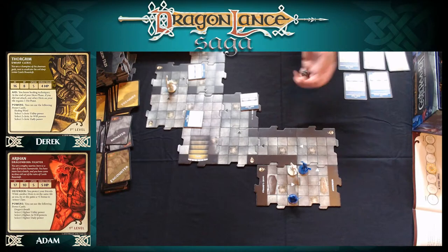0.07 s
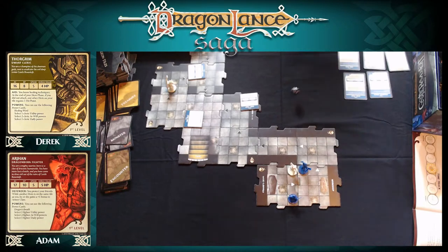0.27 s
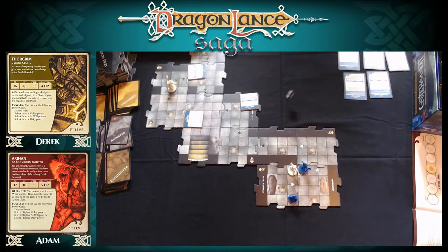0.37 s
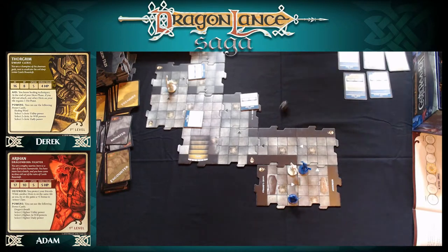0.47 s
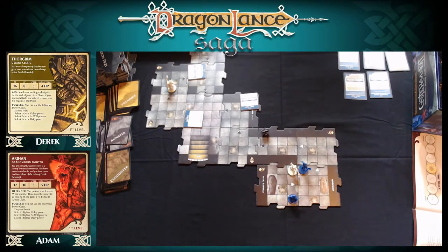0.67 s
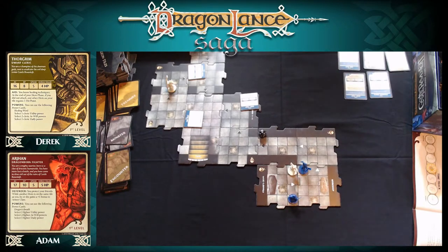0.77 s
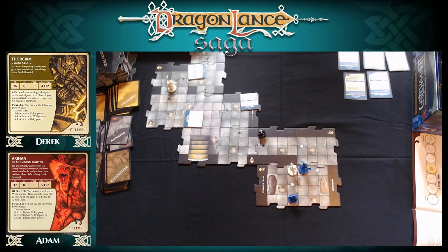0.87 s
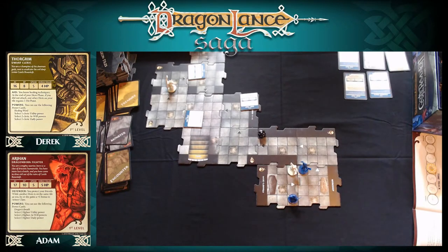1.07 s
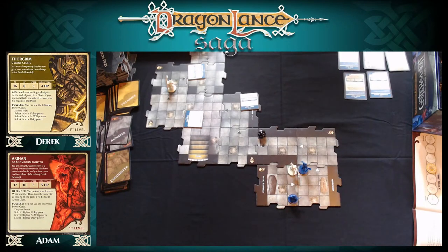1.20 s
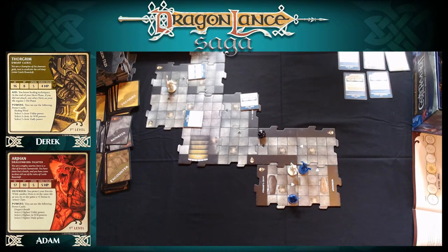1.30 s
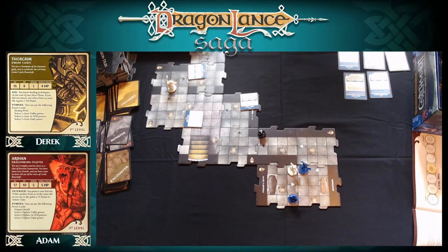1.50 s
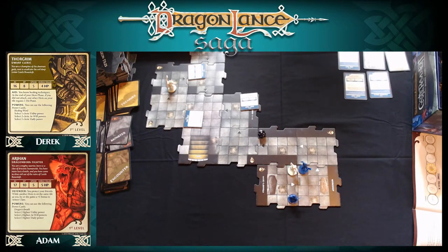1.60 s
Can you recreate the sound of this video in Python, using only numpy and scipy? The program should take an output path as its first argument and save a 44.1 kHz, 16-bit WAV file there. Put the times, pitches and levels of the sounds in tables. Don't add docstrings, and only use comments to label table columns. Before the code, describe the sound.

A small plastic die lands with a sharp knock on a cloth-covered wooden table, bounces, rolls softly and ticks lightly against thin tiles, in a small room with a faint fan hum, heard from a distance.

```python
import sys
import numpy as np
from scipy import signal
from scipy.fft import rfft, irfft
from scipy.io import wavfile

SR = 44100
rng = np.random.default_rng(int(sys.argv[2]) if len(sys.argv) > 2 else 0)


def store_pcm(level_fs):
    pcm = np.round(np.clip(level_fs, -1, 1) * 32767).astype(np.int16)
    wavfile.write(sys.argv[1], SR, np.atleast_2d(pcm).T)


def decibels_to_gain(level_db):
    exponent = np.asarray(level_db, float) / 20
    return 10 ** exponent


N = 72765


def shaped(size, gain):
    hz = np.maximum(np.arange(size // 2 + 1) * SR / size, 1)
    noise = irfft(rfft(rng.standard_normal(size)) * gain(hz), size)
    return noise / noise.std()


def spectrum_gain(points):
    hz, db = np.array(points).T
    return lambda f: decibels_to_gain(np.interp(np.log(f), np.log(hz), db))


# frequency_hz, rms_level_db, bandwidth_hz
FAN_LINES = [(72.7, -64.5, 2.4), (154, -81, 3.8), (177.3, -77, 6), (313, -78.5, 15), (442.3, -73, 4.9),
             (602, -74.5, 34), (1210, -83.5, 8.1), (1556, -86.5, 10), (8500, -95.5, 3.5)]
# frequency_hz, density_db
AIR_SPECTRUM = [(40, -1.5), (100, -3.5), (600, 2), (800, -4), (1600, -4.5), (1900, -10.5), (4000, -23),
                (15000, -25.5)]


def fan():
    t = np.arange(N) / SR
    hum_hz, hum_db, hum_width = FAN_LINES[0]
    wander_rad = 0.43 * shaped(N, lambda f: 1 / (1 + (f / hum_width) ** 2))
    out = np.sqrt(2) * decibels_to_gain(hum_db) * np.sin(2 * np.pi * hum_hz * t + wander_rad)
    for hz, db, width in FAN_LINES[1:]:
        out += decibels_to_gain(db) * shaped(N, lambda f: 1 / (1 + (2 * (f - hz) / width) ** 2))
    flicker_db = 0.6 * shaped(N, lambda f: 1 / (1 + (f / 8) ** 2))
    return out + decibels_to_gain(-68.5 + flicker_db) * shaped(N, spectrum_gain(AIR_SPECTRUM))


# delay_ms, level_db
NEAR_REFLECTIONS = [(.65, 0), (1.3, 1), (1.9, -3)]
# delay_ms, level_db
EARLY_ECHOES = [(5, 1), (10, 1.5), (16.5, -8), (22, -4.5), (27, -9), (32, -26), (43, -22), (52, -9)]
# centre_hz, level_db, t60_s
DIFFUSE_TAIL = [(119.6, -25, 0.93), (265, -26.5, 0.43), (534, -28.5, 0.39), (1056, -25.5, .34),
                (2026, -20, 0.35), (4110, -26, 0.35), (8000, -18.5, 0.33)]


def room(room_db):
    direct_db, near_blur_ms, echo_smear_ms, tail_rise_s = 4.5, 0.09, 1, 0.008
    size = 2 ** 15
    t = np.arange(size) / SR
    near, far = np.zeros(size), np.zeros(size)
    near[0] = decibels_to_gain(direct_db)
    for ms, db in NEAR_REFLECTIONS:
        blur = np.exp(-((t * 1000 - ms) / near_blur_ms) ** 2)
        near += decibels_to_gain(db) * blur / blur.sum()
    scatter = rng.standard_normal(size)
    for ms, db in EARLY_ECHOES:
        patch = scatter * np.exp(-((t * 1000 - ms) / echo_smear_ms) ** 2)
        far += decibels_to_gain(db) * patch / np.linalg.norm(patch)
    for hz, db, t60 in DIFFUSE_TAIL:
        band = shaped(size, lambda f: np.cos(np.pi / 2 * np.clip(np.log2(f / hz), -1, 1)))
        decay = decibels_to_gain(db - 60 * t / t60) * (1 - np.exp(-t / tail_rise_s))
        far += band * np.sqrt(2 * hz / SR) * decay
    return near + decibels_to_gain(room_db) * far


def heard(contact, room_db):
    return signal.fftconvolve(contact, room(room_db))[:N]


def push(at, db, ms):
    t = np.arange(N) / SR
    pulse = np.sin(np.pi * np.clip((t - at) / (ms / 1000), 0, 1)) ** 2
    return pulse / pulse.sum() * decibels_to_gain(db)


def ring(force, modes):
    out = 0
    for k, (hz, db, t60) in enumerate(modes):
        fall = np.log(1000) / (t60 * SR)
        pole = np.exp(2j * np.pi * hz / SR - fall)
        response = signal.lfilter([1], [1, -2 * pole, pole ** 2], force).imag
        out = out + (-1) ** k * decibels_to_gain(db) * np.e * fall * response
    return out


def crack(force, colour, db):
    decay_ms, rise_ms = 0.7, 0.083
    t_ms = np.arange(1024) / SR * 1000
    shape = np.exp(-t_ms / decay_ms) * (1 - np.exp(-t_ms / rise_ms)) ** 2
    gain = spectrum_gain(colour)(np.maximum(np.arange(513) * SR / 1024, 1))
    burst = rng.standard_normal(1024)
    for _ in range(4):
        phase = np.angle(rfft(burst * shape))
        burst = irfft(gain * np.exp(1j * phase))
    return decibels_to_gain(db) * signal.fftconvolve(force, burst * np.sqrt(shape))[:N]


# frequency_hz, level_db, t60_s
TILE_MODES = [(1245, -1.5, 0.0054), (1604, -7.5, .012), (1930, -8.5, 0.0089), (2484, -5, 0.0029),
              (2897, -10.5, 0.0074)]
# frequency_hz, t60_s
DIE_MODES = [(4250, 0.0028), (5750, 0.0045), (8750, 0.0038)]
# frequency_hz, density_db
SNAP_SPECTRUM = [(1500, -16), (2500, 8), (4500, 1), (6300, -5.5), (7000, -12), (9000, -7), (11000, -12),
                 (15000, -52)]
# start_s, level_db, then one level_db per die mode, set by the corner that strikes
TICKS = [
    (0.5554, -69, 4, -10, -5.5),
    (0.5946, -56, 0.5, -30, -16.5),
    (0.6929, -55, -8.5, -8.5, -17),
    (.7269, -54.5, -7.5, -34, -22),
    (0.7604, -63.5, -6, -23, -18),
]


def ticks():
    out = 0
    for at, db, *corner in TICKS:
        force = push(at, db, 0.08)
        die_body = [(hz, share, t60) for (hz, t60), share in zip(DIE_MODES, corner)]
        tick = ring(force, TILE_MODES) + ring(force, die_body) + crack(force, SNAP_SPECTRUM, 16)
        out = out + heard(tick, -1)
    return out


# frequency_hz, level_db, t60_s
THUD_MODES = [(105.9, -38.5, 0.31), (203, -28.5, 0.051), (322.5, -9, 0.027), (363.7, -17.5, .06),
              (471.4, -2, 0.031), (559.3, -8, 0.028), (634.3, 1, 0.015)]
# frequency_hz, level_db, t60_s
KNOCK_MODES = [(777, -8.5, 0.0069), (1057.5, -14.5, 0.013), (1385, -5.5, 0.0061), (1574, -7.5, 0.0079),
               (2073, -3.5, 0.0032)]
# frequency_hz, density_db
CRACK_SPECTRUM = [(1800, -16.5), (2600, 5.5), (3800, 0), (4500, -7.5), (6200, -12.5), (7200, -27.5),
                  (8500, -20), (11500, -39.5)]
# start_s, level_db, contact_ms, thud_share_db, room_share_db
LANDINGS = [
    (0.2404, -22.5, 0.13, -6, 0.5),
    (0.2564, -29, 0.24, -14.5, -4.5),
    (0.394, -30, 0.45, -11, -1.5),
    (.418, -40.5, 0.69, 1, -1.5),
    (0.496, -47, 4.1, 9, 1.5),
    (.535, -53, 2.2, 3.5, 3),
    (.744, -67, 1.54, 8, -3.5),
]


def landings():
    out = 0
    for at, db, ms, thud_db, room_db in LANDINGS:
        force = push(at, db, ms)
        table_top = ring(force, KNOCK_MODES) + decibels_to_gain(thud_db) * ring(force, THUD_MODES)
        out = out + heard(table_top + crack(force, CRACK_SPECTRUM, 20), room_db)
    return out


def scene():
    mic_low_cut = signal.butter(3, 90, "high", fs=SR, output="sos")
    return (signal.sosfilt(mic_low_cut, landings() + ticks()) + fan())[None]


# centre_s, length_s, above_hz
TREBLE_GAPS = [(.068, .02, 3000), (.112, .02, 3000), (.431, .013, 2900), (1.027, .02, 3000),
               (1.113, .02, 3000), (1.551, .035, 2300), (1.637, .035, 2300)]


def treble_gaps(sound):
    t = np.arange(N) / SR
    for at, length, hz in TREBLE_GAPS:
        gap = np.clip(2 - 4 * np.abs(t - at) / length, 0, 1)
        high_pass = signal.butter(8, hz, "high", fs=SR, output="sos")
        sound = sound - gap * signal.sosfiltfilt(high_pass, sound)
    return sound


def top_cut(x):
    return signal.sosfilt(signal.butter(12, 15620, fs=SR, output="sos"), x)


def record(dry):
    mix = treble_gaps(dry)
    return top_cut(mix)


dry = scene()
out = record(dry)
store_pcm(out)
```